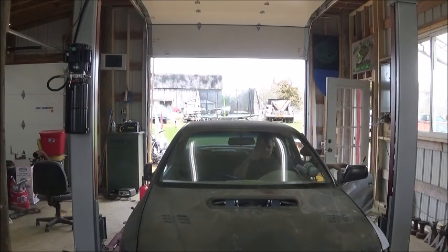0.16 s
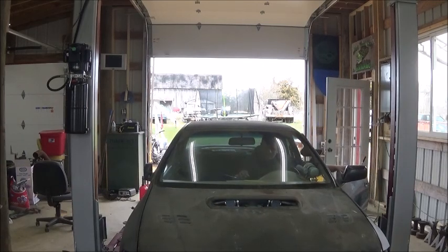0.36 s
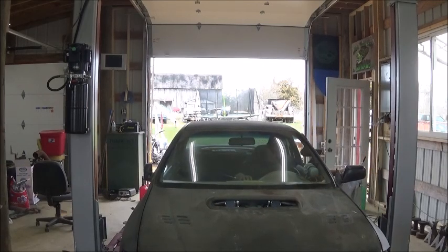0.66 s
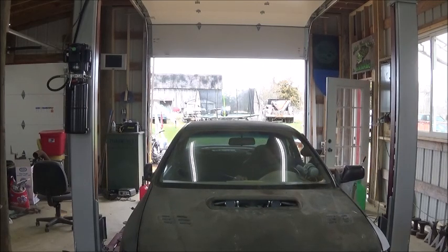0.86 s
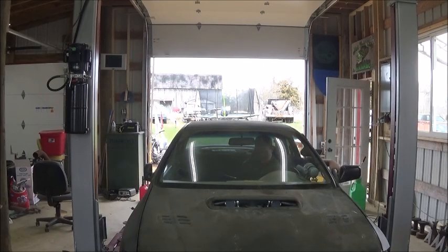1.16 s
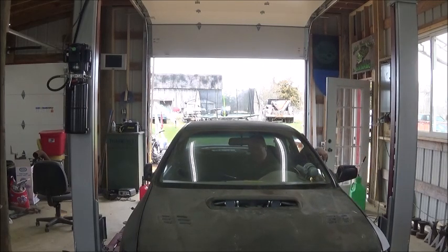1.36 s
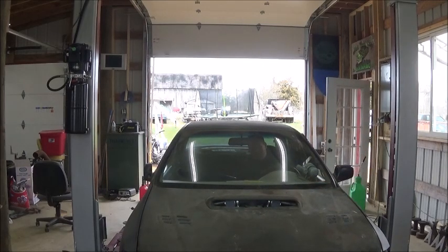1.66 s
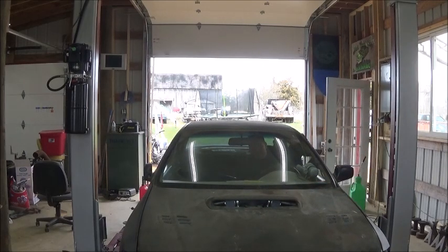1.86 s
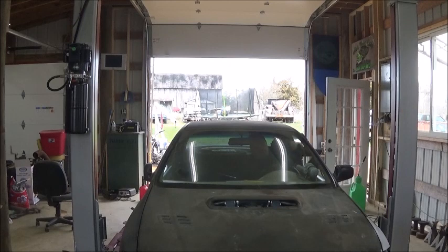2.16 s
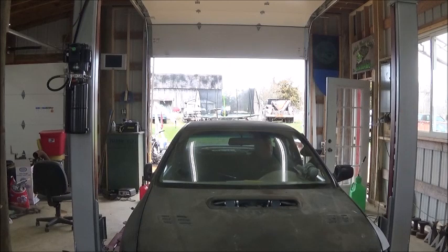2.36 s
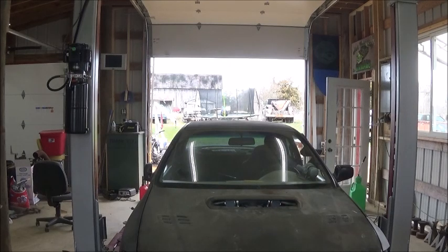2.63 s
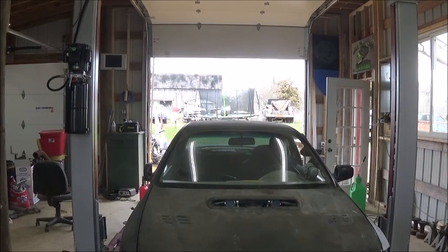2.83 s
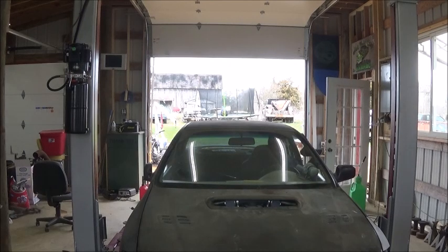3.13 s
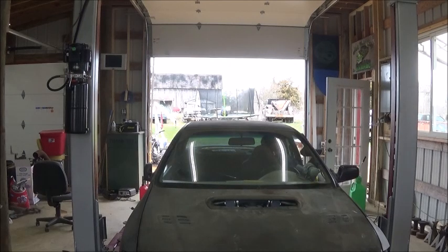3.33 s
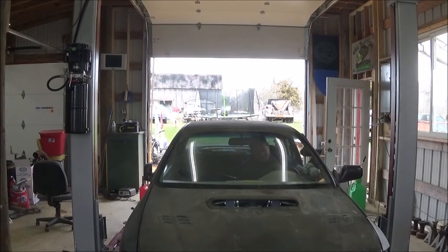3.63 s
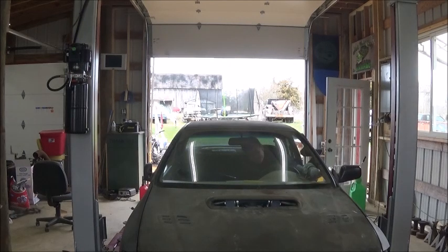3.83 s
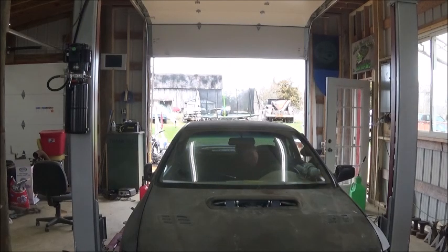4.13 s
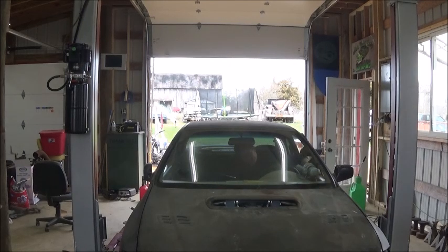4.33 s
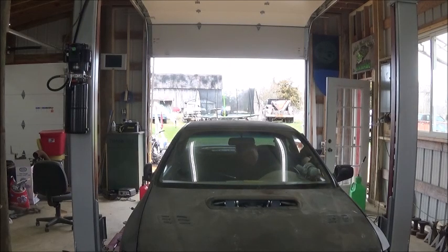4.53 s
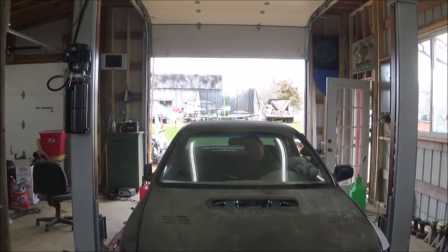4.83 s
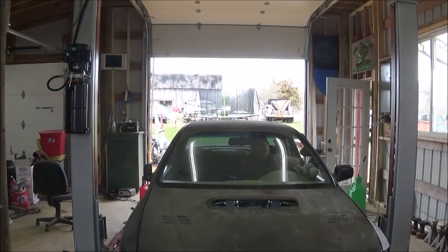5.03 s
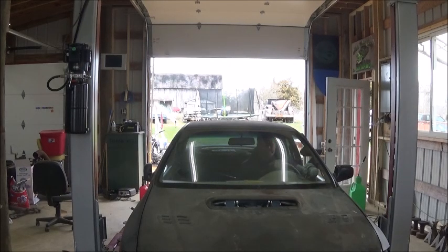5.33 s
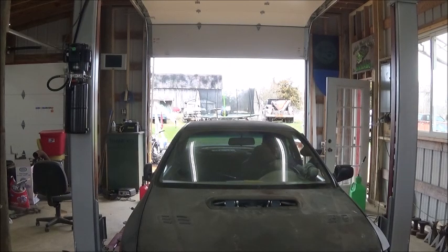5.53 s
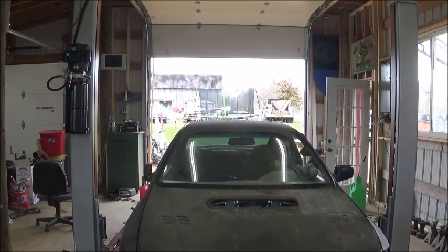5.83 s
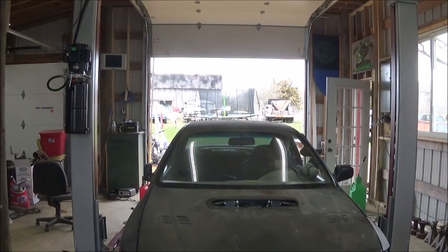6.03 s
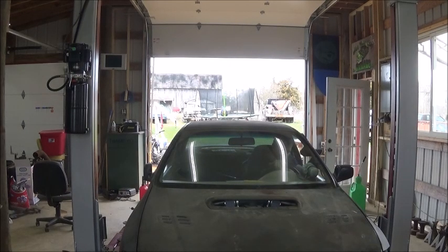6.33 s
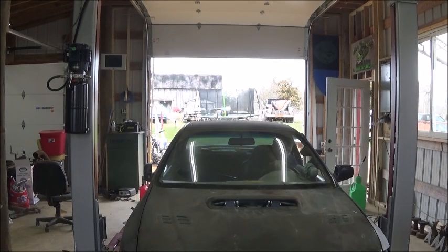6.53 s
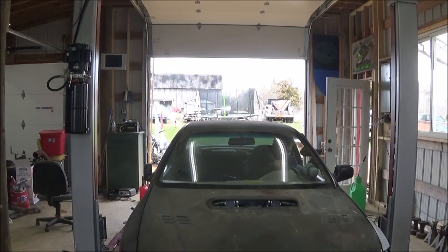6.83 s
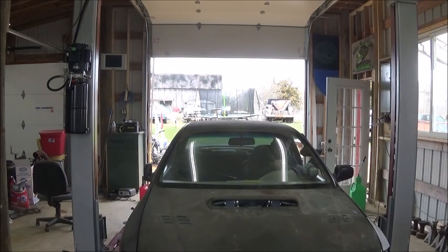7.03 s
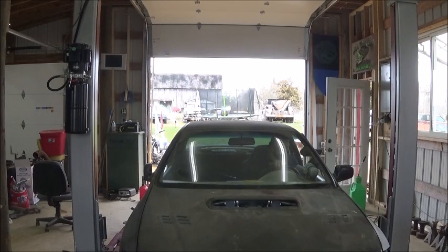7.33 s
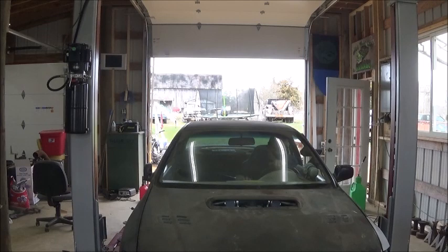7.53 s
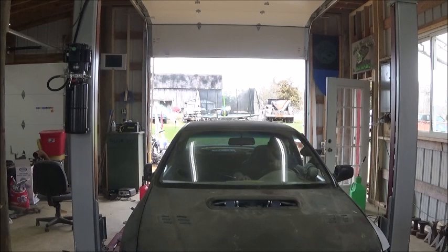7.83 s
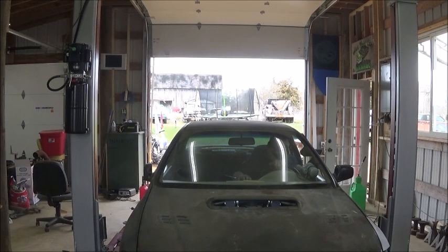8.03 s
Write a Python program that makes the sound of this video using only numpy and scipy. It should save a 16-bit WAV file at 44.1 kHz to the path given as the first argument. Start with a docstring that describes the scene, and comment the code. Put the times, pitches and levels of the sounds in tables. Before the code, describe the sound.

Two hard car door slams echo in a wooden garage, with metallic clanks before them, cabin shuffling and light taps after, and a hollow click at the end.

```python
"""A wooden garage: someone in a car rattles the open door, slams it, unlatches it and slams it again,
then shifts about and knocks lightly inside. Each slam is a chain of blows: seal, latch, door seating, rocking.
Blows are bursts of small contacts that set panels ringing; clothes are coloured noise; a faint bird is a
fluttering tone. The microphone stands beyond the bonnet and hears mostly the room, made of fading echoes."""
import sys
import numpy as np
from scipy import signal
from scipy.fft import rfft, irfft
from scipy.io import wavfile

SR = 44100
rng = np.random.default_rng(int(sys.argv[2]) if len(sys.argv) > 2 else 0)


def dump(signal):
    """Clip the signal to [-1, 1] and save it as 16-bit WAV at the path in sys.argv[1]."""
    limited = np.clip(np.atleast_2d(signal).T, -1, 1)
    pcm = np.round(limited * 32767).astype(np.int16)
    wavfile.write(sys.argv[1], SR, pcm)


N = 360738
TIME = np.arange(N) / SR
SECOND = TIME[:SR]  # clock for one second of ringing


def undb(db):
    """Decibels to gain."""
    return 10 ** (np.asarray(db) / 20)


def unit(x):
    """Scale to unit energy."""
    return x / np.sqrt(np.sum(x ** 2))


def at_hz(points, hz):
    """Read a curve of (f/Hz, value) points on a log-frequency axis."""
    f, value = np.transpose(points)
    return np.interp(np.log(np.maximum(hz, 1)), np.log(f), value)


def fade(t60):
    """One second of a decay that falls by 60 dB in t60 seconds."""
    return np.exp(-np.log(1000) * SECOND / t60)


def through(x, response):
    """Let a sound set off the given response at every sample."""
    return signal.fftconvolve(x, response)[:N]


def colour(points, size=4096):
    """Short unit-energy response with the given spectrum, its energy packed to the front (minimum phase)."""
    level_db = at_hz(points, np.arange(size // 2 + 1) * SR / size)
    cepstrum = irfft(np.log(undb(level_db)))
    cepstrum[1:size // 2] *= 2
    cepstrum[size // 2 + 1:] = 0
    return unit(irfft(np.exp(rfft(cepstrum))))


def ring(modes):
    """Fading tones struck together, as when a solid thing is hit."""
    return sum(undb(db) * fade(t60) * np.sin(2 * np.pi * hz * SECOND) for hz, db, t60 in modes)


def radiate(x, edge_hz):
    """A panel radiates little at wavelengths much longer than itself."""
    return signal.sosfilt(signal.butter(4, edge_hz, "high", fs=SR, output="sos"), x)


def add(track, s, sound):
    """Mix a sound into a track at time s."""
    start = max(int(s * SR), 0)
    track[start:start + len(sound)] += sound[:N - start]


def contacts(times, levels_db, rattles, first, per_second):
    """Force of blows: a first contact, then a dying shower of small ones as loose parts chatter."""
    force = np.zeros(N)
    for s, db, rattle in zip(times, levels_db, rattles):
        hits = rng.standard_normal(SR) * (rng.random(SR) < per_second / SR)
        shower = unit(hits * np.exp(-SECOND / rattle) + 1e-12)
        shower[0] += first
        add(force, s, undb(db) * unit(shower))
    return force


def spread(mid, side, width):
    """Two close microphone ports: alike in the bass, less so higher up."""
    hz = np.arange(len(side) // 2 + 1) * SR / len(side)
    side = irfft(rfft(side) * undb(at_hz(width, hz)), len(side))
    return np.array([mid + side, mid - side])


# how fast the garage's echoes die at each pitch: f/Hz, t60/s
GARAGE_T60 = [(50, 0.5108), (150, 0.7753), (500, 0.61213), (1500, 0.48396), (3500, 0.52713), (7000, 0.3106),
              (14000, 0.32697)]


def reflections(build_s=0.0017, count=10):
    """Two unrelated sets of echoes off walls and clutter: they thicken quickly, then die away, treble first."""
    spectrum = rfft(rng.standard_normal((2, SR)))
    centres = np.geomspace(60, 16000, count)
    # each frequency's place on the scale of overlapping bands
    place = np.interp(np.log(np.arange(SR // 2 + 1) + 1), np.log(centres), np.arange(count))
    tail = 0
    for k, hz in enumerate(centres):
        band = irfft(spectrum * np.maximum(1 - abs(place - k), 0), SR)
        tail = tail + band * fade(at_hz(GARAGE_T60, hz))
    return tail * (1 - np.exp(-SECOND / build_s))


# difference between the two ports for echoes: f/Hz, side minus mid level/dB
ECHO_WIDTH = [(50, -35), (110, -23), (200, -28), (380, -14.5), (700, -7.5), (1300, -3), (2400, -4.5),
              (4400, -4.5), (8000, -4), (15000, -25.5)]


def garage(x, direct_db, right_db, width_db):
    """Each source has its own echo pattern, plus a direct path (in dB above a single echo)."""
    mid, side = reflections()
    response = spread(mid, undb(width_db) * side, ECHO_WIDTH)
    response[:, 0] += undb(direct_db)
    pan = undb(np.array([[-right_db], [right_db]]) / 2)
    return pan * signal.fftconvolve(x[None], response, axes=1)[:, :N]


# colour of the still air: f/Hz, relative level/dB
AIR_COLOUR = [(15, -24.5), (25, 2.5), (96, -4.5), (129, 0), (148, -6.5), (246, -9), (281, -11.5),
              (359, -10.5), (722, -14.5), (2170, -18.5), (2360, -20), (2770, -17.5), (6550, -24.5),
              (15500, -27)]
# difference between the two ports in the open air: f/Hz, side minus mid level/dB
AIR_WIDTH = [(60, -27.5), (110, -24), (200, -9.5), (380, -3.5), (700, -0.5), (1290, 0.5), (2380, -3),
             (4400, -5.5), (8120, -8), (15000, -35.5)]
AIR_DB, WHINE_HZ, WHINE_DB = -54, 7868, -71.5


def air():
    """Quiet outdoor rumble and hiss from coloured noise; a thin whine from noise through a narrow ring."""
    mid, side = (through(rng.standard_normal(N), colour(AIR_COLOUR)) for _ in range(2))
    whine = through(rng.standard_normal(N), unit(ring([(WHINE_HZ, 0, .03)])))
    return undb(AIR_DB) * spread(mid, side, AIR_WIDTH) + undb(WHINE_DB) * whine


# movements on the seat: t/s, time until it settles/s, relative level/dB
MOVES = [(0, 0.5052, -41.5), (.92, 0.34385, -44), (1.802, 0.4044, -44.5), (2.169, 0.1941, -41.5),
         (2.58, 1.6, -48.5), (4.7, 0.4792, -59)]
MOVE_ATTACK_S, MOVE_RELEASE_S = 0.04035, 0.3803


def movement():
    """How strongly the sitter moves, as a gain: each movement swells, holds and settles."""
    effort = np.zeros(N)
    for s, length, db in MOVES:
        swell = np.clip((TIME - s) / MOVE_ATTACK_S, 0, 1)
        settle = np.exp(-np.maximum(TIME - s - length, 0) / MOVE_RELEASE_S)
        effort = np.maximum(effort, undb(db) * swell * settle)
    return effort


# colour of rubbing clothes: f/Hz, relative level/dB
CLOTH = [(30, -1), (70, -3), (140, 2), (300, -3), (600, -5.5), (1200, -11.5), (2500, -13), (6000, -18),
         (11000, -22), (16000, -40)]


def shifting(grain_db=3.0, stroke_db=1.0, db_trim=-36, size=256, count=130):
    """Clothes rub on the seat in dense uneven grains, bunched into short strokes."""
    grain_level = undb(grain_db * rng.exponential(size=N // size + 1)).repeat(size)[:N]
    grains = rng.standard_normal(N) * grain_level
    strokes = np.interp(TIME, np.linspace(0, TIME[-1], count), rng.standard_normal(count))
    rubbing = through(grains / grains.std(), colour(CLOTH))
    return rubbing * movement() * undb(stroke_db * strokes + db_trim)


# clanks of loose metal at the open door: t/s, clash level/dB, ring level/dB, rattle time/s
CLANKS = [(.001, -21, -31.5, 0.00569), (.236, -31.5, -51, .012), (.278, -24, -54, 0.03157),
          (.293, -23.5, -61, 0.00875)]
# colour of the clash: f/Hz, relative level/dB
CLASH = [(100, -20.5), (400, -11.5), (850, -10.5), (1100, -4), (1600, 6), (2500, 4), (4000, 1), (5200, 1.5),
         (6800, 2.5), (9500, -1), (13000, -14), (14800, -16.5), (15400, -7.5), (16000, -38)]
# what the loose part rings with: f/Hz, relative level/dB, t60/s
LOOSE_PART = [(350.9, 6, 0.1284), (827.9, -7, 0.096), (882.5, 4, 0.0336), (1438.9, -4.5, 0.404),
              (1487.5, 2.5, 0.1191), (1764.6, -10, 0.1038), (2274.1, 0.5, 0.143), (2760, -13, 0.1235),
              (4421.8, -13.5, 0.302), (6578.4, 1, 0.0551), (7477, -2.5, 0.0962)]
# squeaks of a dry joint: t/s, level/dB, dying time/s
SQUEAKS = [(.284, -20, .02), (.344, -30, .02), (5.21, -55, 0.014)]
# colour of the squeaks: f/Hz, relative level/dB
SQUEAK_COLOUR = [(200, -45), (1100, -28), (1380, -11), (1520, 0), (1680, 0), (1800, -10), (2050, -24),
                 (2450, -13), (2800, -10), (3200, -24), (4000, -20), (8000, -40)]


def clanks():
    """Loose metal parts clash and ring; a dry joint squeaks in a quick run of slips."""
    s, clash_db, ring_db, rattle = np.transpose(CLANKS)
    metal = np.zeros(N)
    for db, response in ((clash_db, colour(CLASH)), (ring_db, unit(ring(LOOSE_PART)))):
        metal += through(contacts(s, db, rattle, first=0.5413, per_second=2200), response)
    slips = contacts(*np.transpose(SQUEAKS), first=0.269, per_second=2000)
    return metal + through(slips, colour(SQUEAK_COLOUR))


# soft thumps on the interior: t/s, thud level/dB, clack relative to thud level/dB, rattle time/s
THUMPS = [(.002, -46, 9, 0.01222), (.284, -41, -9, 0.02367), (1.29, -41, -5, 0.1041),
          (2.406, -39.5, -5, 0.0959), (2.619, -42.5, 0.5, 0.052), (3.519, -28.5, -11.5, 0.01832),
          (4.101, -42.5, -20.5, 0.022), (5.664, -49.5, -2, 0.00583), (6.297, -32.5, -7, 0.01322),
          (7.623, -52.5, -13.5, 0.01228)]
# scuffs of hands on hard trim: t/s, level midway between clack and tick/dB, tick above clack/dB, rattle time/s
SCUFFS = [(.77, -48.5, 9.5, 0.2073), (2.194, -45.5, -0.5, 0.00996), (2.3, -46.5, -4.5, 0.01192),
          (3.752, -42.5, 7.5, 0.012), (4.635, -51.5, 6.5, 0.02575), (4.994, -41.5, -9, 0.02568),
          (5.56, -50.5, 9.5, 0.0263), (6.655, -48.5, -7, 0.00622), (6.69, -45, -8, .029),
          (6.748, -47, -12, .01)]
# what a soft knock rings with: f/Hz, relative level/dB, t60/s
THUD = [(107, 0, 0.16), (132.7, -5, 0.15), (159.9, 3, 0.1675), (213.63, -0.5, 0.06933),
        (261.57, 2, 0.08097), (307.38, -3, 0.09622), (387, -3.5, 0.05), (553, -19, 0.04)]
# colours of soft trim and of small ticks: f/Hz, relative level/dB
TRIM = [(100, -13.5), (300, 2.5), (600, 5), (1100, 0), (2000, -4), (3500, -12), (7000, -19.5),
        (14000, -70.5)]
TICK_COLOUR = [(500, -29), (2000, -4.5), (4500, -0.5), (7500, 1.5), (10500, -1.5), (13000, -12),
               (16000, -16.5)]
# a thump's tick and a scuff's thud, each relative to its own clack
THUMP_TICK_DB, SCUFF_THUD_DB = -15, -11.5


def knocks():
    """Light knocks: a soft thud in one push, a clack of trim and a tick; scuffs trade clack for tick."""
    knock_rows = []  # t/s, thud level/dB, clack level/dB, tick level/dB, rattle time/s
    for s, db, clack, rattle in THUMPS:
        knock_rows.append((s, db, db + clack, db + clack + THUMP_TICK_DB, rattle))
    for s, db, bright, rattle in SCUFFS:
        clack_db = db - bright / 2
        knock_rows.append((s, clack_db + SCUFF_THUD_DB, clack_db, db + bright / 2, rattle))
    s, thud_db, trim_db, tick_db, rattle = np.transpose(knock_rows)
    panel = unit(radiate(ring(THUD), edge_hz=120.7))
    sound = through(contacts(s, thud_db, rattle, first=4.918, per_second=420), panel)
    for db, spectrum in ((trim_db, TRIM), (tick_db, TICK_COLOUR)):
        sound += through(contacts(s, db, rattle, first=0.17, per_second=1200), colour(spectrum))
    return sound


# sharp ticks of hard parts: t/s, level/dB
TICKS = [(1.46, -57), (2.096, -57), (2.425, -53), (2.717, -59), (3.146, -41.5), (3.39, -52.5),
         (3.813, -47.5), (4.136, -48)]


def ticks(rattle_s=0.0034, stray_per_s=3, stray_db=-19):
    """Brief bright contacts; fainter stray ones come at random while the sitter moves."""
    s, db = np.transpose(TICKS)
    stray = (rng.random(N) < stray_per_s / SR) * movement() * undb(stray_db)
    sharp = contacts(s, db, np.full(len(s), rattle_s), first=0.7275, per_second=6000)
    return through(sharp + stray, colour(TICK_COLOUR))


# chirps outside: t/s, middle f/Hz, relative level/dB
CHIRPS = [(1.19, 6916, -61.5), (3.22, 6785, -56), (3.87, 6794, -59), (5.6, 6772, -66), (7.13, 6480, -62)]


def bird(length_s=0.19, buzz_hz=150, swing=.05, db_trim=-30):
    """Thin buzzy chirps: the pitch glides down with a fast flutter that quickens from buzz_hz."""
    out, t = np.zeros(N), SECOND[:int(length_s * SR)]
    for s, hz, db in CHIRPS:
        flutter = swing * np.sin(2 * np.pi * buzz_hz * t * (1 + t))
        pitch = hz * (1 + flutter - swing * (t / length_s - .5))
        tone = np.sin(2 * np.pi * np.cumsum(pitch) / SR)
        add(out, s, undb(db + db_trim) * np.sin(np.pi * t / length_s) * tone)
    return out


# slams of the door: t/s, force level/dB, latch strength level/dB, time until the latch catches/s
SLAMS = [(1.654, -1.6109, 0.3817, .032), (4.234, -0.2355, 0, .021)]
# stages of every slam, before its force is added:
# boom level/dB, sheet metal level/dB, latch level/dB, skin f/Hz, rattle time/s
SEAL_MEETS = (-8.5, -22, -54.5, 177.5, 0.0496)
SEAL_SQUEEZES = (-11.5, -15.5, -28, 158, 0.0048)
LATCH_CATCHES = (-11.5, -12, -16.5, 290, 0.0002)
DOOR_SEATS = (-4, -12, -21, 188, 0.0368)
DOOR_ROCKS = (-7.5, -15.5, -36, 129, 0.04)
# loss per rebound: boom level/dB, sheet metal level/dB, latch level/dB
REBOUND_LOSS = (5.5, 7.5, 12.5)
# the first two count from the first touch; the third is the mean period of the rocking
SQUEEZE_AFTER_S, SEATS_AFTER_S, REBOUND_S = .007, .05, .058
# a harder slam raises the skin's pitch; the panels' clatter grows faster than the force
SKIN_HZ_PER_DB, SHEET_DB_PER_DB = 4, 2


def slam(s, force_db, latch_db, latch_s, wobble_s=.005, count=3):
    """The seal is touched and squeezed, the latch catches, the door seats and rocks ever more weakly."""
    stages = [(0, SEAL_MEETS), (SQUEEZE_AFTER_S, SEAL_SQUEEZES), (latch_s, LATCH_CATCHES),
              (SEATS_AFTER_S, DOOR_SEATS)]
    loss = np.append(REBOUND_LOSS, [0, 0])
    for k, chance in enumerate(rng.standard_normal(count)):
        delay = SEATS_AFTER_S + (k + 1) * REBOUND_S + wobble_s * chance
        stages.append((delay, DOOR_ROCKS - k * loss))
    sheet_db = SHEET_DB_PER_DB * force_db
    blows = []  # t/s, boom level/dB, sheet level/dB, latch level/dB, skin f/Hz, rattle time/s
    for delay, stage in stages:
        # until it catches, the latch only jingles with the force of the swing
        latch_now_db = latch_db if delay >= latch_s else sheet_db
        change = [force_db, sheet_db, latch_now_db, SKIN_HZ_PER_DB * force_db, 0]
        blows.append((s + delay, *np.add(stage, change)))
    return blows


# the car body: f before the random shift/Hz, relative level/dB, t60/s
BODY = [(97, -19, .4), (118, -9, .6), (134, -12, .3), (187, -6, .42), (213, -11, .45), (269, -16, .45),
        (388, -15, .55), (516, -21, .5), (633, -19, .45)]


def door_boom(blows, skin_t60=0.18818, push_s=0.002759, body_db=-6.0, detune=0.02495):
    """The seal cushions each blow: the skin swings, the body hums, its modes shifted a little at random."""
    out = np.zeros(N)
    chances = rng.standard_normal((len(blows), len(BODY)))
    for (s, db, _, _, hz, _), chance in zip(blows, chances):
        modes = [(f * (1 + detune * c), level + body_db, t60) for (f, level, t60), c in zip(BODY, chance)]
        cushion = 1 - np.exp(-SECOND / push_s)
        add(out, s, undb(db) * cushion * (ring([(hz, 0, skin_t60)]) + ring(modes)))
    return radiate(out, edge_hz=99.96)


# colours of sheet metal and of the latch: f/Hz, relative level/dB
SHEET = [(60, -32), (150, -11), (250, -3), (400, -2), (650, -3), (950, -2), (1300, -8), (2000, -10),
         (3200, -14), (5000, -24), (9000, -33), (15000, -48)]
LATCH = [(200, -22.5), (800, -9), (1500, 10.5), (2550, 3.5), (2900, -4.5), (3700, 2.5), (4500, -4.5),
         (6500, -2), (9000, -9), (12000, -17), (15500, -41)]


def door_metal(blows, latch_share=0.9141):
    """Panels and glass rattle after each blow; the hard latch settles sooner."""
    s, _, sheet_db, latch_db, _, rattle = np.transpose(blows)
    sheet = contacts(s, sheet_db, rattle, first=0.19024, per_second=600)
    latch = contacts(s, latch_db, rattle * latch_share, first=0.9765, per_second=1400)
    return through(sheet, colour(SHEET)) + through(latch, colour(LATCH))


# opening the door (handle pulled, latch springs, door jerks free, seal lets go):
# t/s, boom level/dB, sheet metal level/dB, latch level/dB, skin f/Hz, rattle time/s
OPENING = [(2.858, -29.5, -28, -41.5, 161.3, 0.0695), (2.921, -23, -16, -14, 181.6, 0.00942),
           (3.04, -33, -23, -32, 169.3, 0.00984), (3.098, -22.5, -30.5, -33, 128.7, 0.0219)]
# the cabin's answer to a push of air: f/Hz, relative level/dB, t60/s
CABIN = [(38.324, 6.5, 0.4918), (58.05, -8, 1.477), (67.44, 0.5, 0.46)]
PUMP_DB = -15  # push of air relative to the boom's level in the tables


def cabin(swell_s=0.051):
    """The door pumps the cabin as it seats and as it leaves the seal: trapped air swells and swings slowly."""
    out = np.zeros(N)
    pushes = [(s + SEATS_AFTER_S, DOOR_SEATS[0] + force_db) for s, force_db, *_ in SLAMS]
    pushes.append(OPENING[-1][:2])
    for s, db in pushes:
        add(out, s, undb(db + PUMP_DB) * (1 - np.exp(-SECOND / swell_s)) * ring(CABIN))
    return out


# a hollow plastic click close by: t/s, level/dB, rattle time/s
CLICKS = [(7.964, -36, 0.006955), (7.977, -27.5, 0.013015)]
# colour of the plastic shell: f/Hz, relative level/dB
PLASTIC = [(60, -35.5), (120, 7), (190, -6), (280, -12), (470, 7), (850, -0.5), (1350, -7.5), (2100, -18.5),
           (3200, -20), (4500, -14), (6500, -21.5), (10300, -16.5), (11450, -5.5), (12500, -29),
           (14500, -50)]


def plastic_click():
    """A two-step click in a hollow plastic shell."""
    return through(contacts(*np.transpose(CLICKS), first=1.0, per_second=2600), colour(PLASTIC))


def scene(boom_db=-34.5, count=3):
    """The sources ring through the garage; the cabin's air and the still air are added straight in."""
    blows = [blow for row in SLAMS for blow in slam(*row)] + OPENING
    # successive blows come from different parts of the door, so their echoes differ
    door = sum(garage(door_metal(blows[k::count]), direct_db=11, right_db=2.0, width_db=-4)
               for k in range(count))
    boom = undb(boom_db) * garage(door_boom(blows), direct_db=36.0, right_db=-0.2581, width_db=14.5)
    # the cabin's air is slightly louder on the left
    boom += cabin() * undb([[0.999], [-0.999]])
    inside = garage(knocks(), direct_db=20.5, right_db=-0.2175, width_db=-6.5)
    inside += garage(shifting() + bird(), direct_db=30.5, right_db=0.468, width_db=1.0)
    small = garage(clanks(), direct_db=21.5, right_db=0.8752, width_db=-4.5)
    small += garage(ticks(), direct_db=30.5, right_db=1.5, width_db=-4)
    small += garage(plastic_click(), direct_db=18.5, right_db=0.053, width_db=-5.5)
    return door + boom + inside + small + air()


TOP_HZ = 15850


def record(dry, ceiling=1.385):
    """The recorder rounds the loudest peaks and cuts the top."""
    rounded = ceiling * np.tanh(dry / ceiling)
    return signal.sosfilt(signal.ellip(10, .2, 80, TOP_HZ, fs=SR, output="sos"), rounded)


dry = scene()
out = record(dry)
dump(out)
```